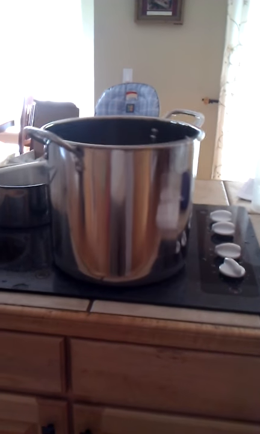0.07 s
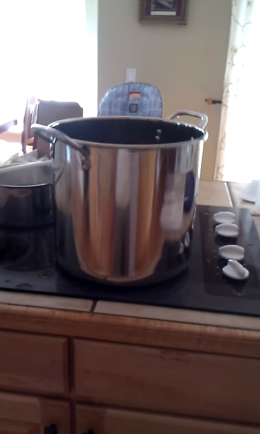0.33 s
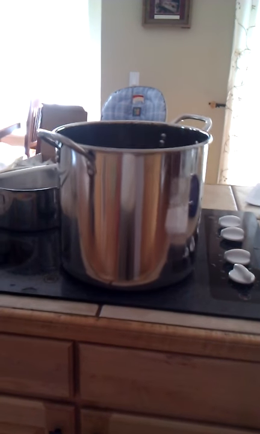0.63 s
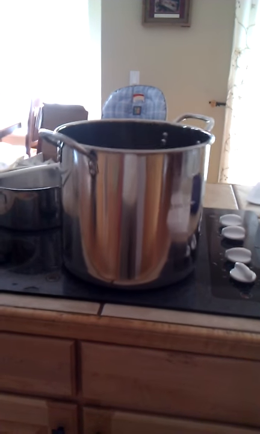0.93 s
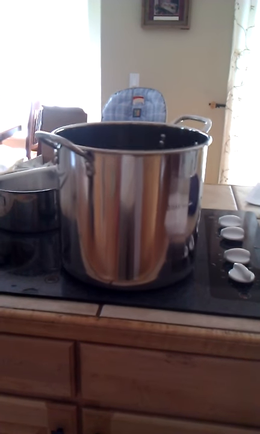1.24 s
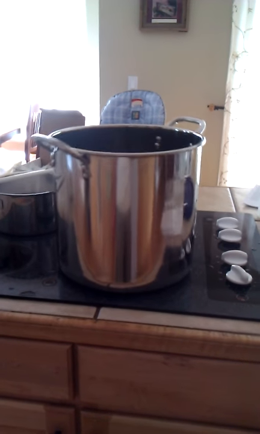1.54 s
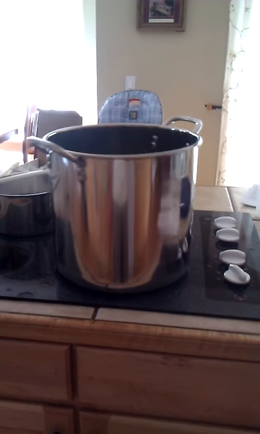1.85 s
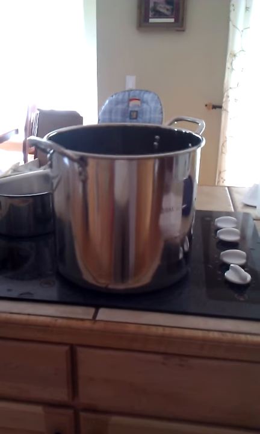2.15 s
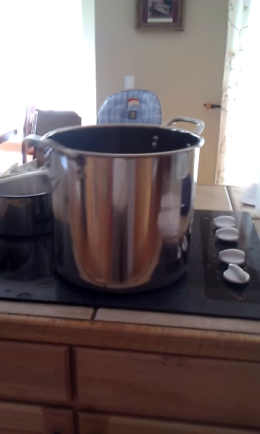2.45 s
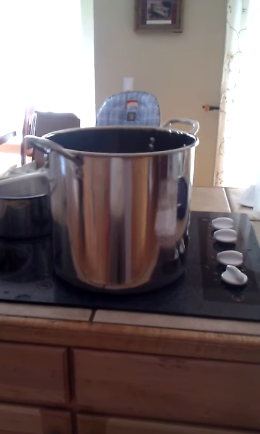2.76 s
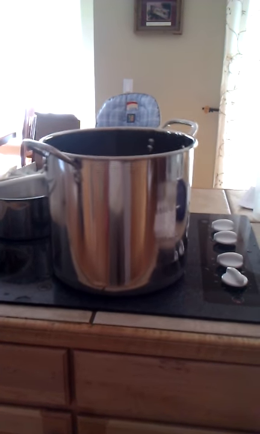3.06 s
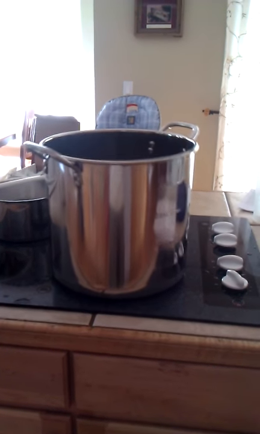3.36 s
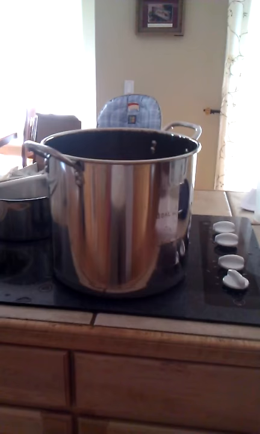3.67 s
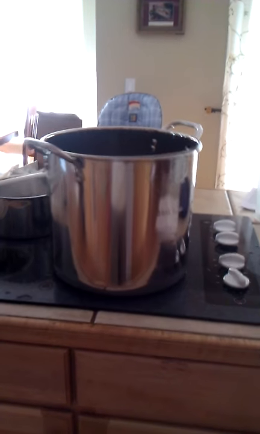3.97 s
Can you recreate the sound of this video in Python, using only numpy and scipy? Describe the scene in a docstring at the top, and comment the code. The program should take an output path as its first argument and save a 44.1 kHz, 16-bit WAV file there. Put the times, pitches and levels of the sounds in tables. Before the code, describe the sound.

A steel pot of heating water sizzles and rattles throughout over a low rumble, a little stronger in the first half second. Short buzzing bursts of steam break in irregularly. The base knocks on the cooktop around 1.3 and 2 seconds. The metal sings faintly near 2.9 seconds, then sharper buzzes and ticks cluster from 3 to 3.7 seconds, with a short kitchen echo.

```python
"""A pot about to boil

A tall steel stock pot heats on an electric cooktop. Tiny steam bubbles collapse on its hot base
in a rattling sizzle, and larger ones rumble lower down. Now and then a pocket of steam collapses
in a buzzing burst, or the base knocks on the cooktop. The pot and the kitchen ring with it all."""
import sys
import numpy as np
from scipy import signal
from scipy.fft import rfft, irfft, next_fast_len
from scipy.io import wavfile
from scipy.ndimage import map_coordinates

SR = 44100
rng = np.random.default_rng(int(sys.argv[2]) if len(sys.argv) > 2 else 0)


def master_out(mix):
    """Clip the mix to full scale and print it as 16-bit PCM to the path in sys.argv[1]."""
    frames = np.transpose(np.atleast_2d(mix))
    ceiling = np.clip(frames, -1, 1)
    pcm = np.round(ceiling * 32767).astype(np.int16)
    wavfile.write(sys.argv[1], SR, pcm)


N = 176400

# The tone of the quiet room: frequency_hz, level_db
ROOM_TONE = [(20, -2.5), (50, -15.5), (130, 9), (400, -2.5), (2000, -18.5), (8000, -25.5)]
# How long the kitchen's echo takes to fade by 60 dB: frequency_hz, fade_s
ECHO_TIMES = [(150, 0.43), (1000, 0.44), (4000, 0.38), (8000, 0.28)]
# The overall tone of the filled pot: frequency_hz, gain_db
POT_TONE = [(20, -34), (45, -17.5), (80, -28.5), (125, -13), (230, -7), (330, -1.5), (530, -8.5), (720, -2),
            (1130, -5.5), (1500, -3.5), (1900, 1), (2850, -3.5), (3600, -2), (4200, 1.5), (4700, -4.5),
            (5350, -9), (5700, -18.5), (6400, -19), (8000, -17.5), (9000, -47)]
# Pitches that the steel wall boosts: pitch_hz, width_hz, boost_db
WALL_RESONANCES = [(118.5, 10, 2.5), (153, 45, 6), (270, 24, 9.5), (380.5, 63, 6), (788.3, 24, 6.5),
                   (937.6, 33, 9), (1095, 26, 2), (1223, 28, 6.5), (1278, 15, 6), (1421, 32, 4.5),
                   (2017, 39, 2), (2278, 23, 5.5), (2655, 6.7, 0.5), (3230, 40, 7), (4300, 29, -1.5)]
# Clear notes from the wall: start_s, length_s, pitch_hz, level_db
WALL_NOTES = [(2.82, 0.19, 942, -47), (2.875, 0.12, 2008, -49.5), (3.042, 0.068, 1082, -48.5)]
# Knocks on the cooktop: start_s, level_db, centre_hz, half_width_octaves
BASE_KNOCKS = [(1.2461, -5.5, 3500, 1.7), (1.249, -1.5, 3950, 0.17), (1.256, -8.5, 1500, 1.6),
               (1.267, 0, 700, 0.83), (1.308, -11, 2000, 0.66), (1.942, 3, 400, 0.34),
               (1.944, 1, 1000, 0.6), (1.956, 1.5, 450, .4), (2.036, -3.5, 950, .4), (2.055, -5, 292, 0.22),
               (3.037, -2.5, 6000, 0.32), (3.127, -13, 2000, 0.85), (3.338, -4, 4230, 0.095),
               (3.586, -7, 4430, .4), (3.608, -1, 1400, 0.79), (3.616, -8.5, 3200, 2.3),
               (3.647, 0.5, 2700, .4), (3.679, -5, 2900, 0.28)]
# Steam bursts: start_s, length_s, rattle_db, pitch_hz, cavity_db, overtone_ratio, overtone_db
STEAM_POCKETS = [(0.061, 0.048, -39, 470, -27, 2.4, -21.5), (0.194, 0.026, -40, 1880, -25, 1.3, -39),
                 (0.289, 0.11, -47, 288, -25, 4.35, -28.5), (0.596, 0.013, -42.5, 1210, -31, 2.5, -38),
                 (0.803, 0.029, -47, 1800, -42, 2.4, -38), (1.179, 0.014, -43.5, 4060, -43, 1.27, -26),
                 (1.243, 0.027, -34.5, 585, -24.5, 6.5, -31), (1.297, 0.019, -39, 960, -29, 1.74, -27),
                 (1.327, 0.012, -40, 2500, -38, 2.65, -24), (1.352, 0.082, -50, 2380, -37, 0.99, -46),
                 (1.59, 0.03, -40.5, 1790, -40, 2.3, -37), (1.613, 0.084, -61, 1740, -37, 1.1, -36),
                 (1.934, 0.027, -37.5, 391, -22.5, 2.02, -26), (2.335, 0.008, -38, 1990, -31.5, 3.2, -29.5),
                 (2.453, 0.035, -38.5, 843, -29.5, 5, -31.5), (2.63, 0.061, -37.5, 1740, -43, 1.27, -41),
                 (2.807, 0.017, -38, 1800, -36, 2.6, -39), (3.029, 0.036, -41.5, 1785, -26.5, 3.1, -21),
                 (3.074, 0.027, -45.5, 1680, -27.5, 1.17, -30),
                 (3.142, 0.053, -44.5, 1220, -35.5, 1.7, -32.5),
                 (3.288, 0.021, -42, 1850, -32, 2.25, -29.5), (3.316, 0.031, -37, 1840, -33, 2.37, -18.5),
                 (3.384, .025, -46, 2060, -41, 2.4, -27.5), (3.585, 0.018, -38, 2780, -18.5, 1.3, -24.5),
                 (3.609, 0.015, -35.5, 2670, -19, 2.6, -19.5),
                 (3.635, 0.014, -42, 2550, -23.5, 2.85, -27.5), (3.7, 0.02, -49, 2050, -29.5, 1.3, -26)]
# How loud the small and large bubbles are: time_s, sizzle_db, rumble_db
SIMMER_LEVELS = [(0, -33, -37), (.08, -34.5, -31.5), (.16, -34.5, -41), (.22, -33.5, -30),
                 (.36, -34.5, -36), (.46, -37, -36.5), (.7, -40.5, -40), (1.03, -40, -43), (1.2, -39, -43),
                 (1.351, -39.5, -43), (1.54, -42.5, -41), (1.659, -40.5, -41.5), (1.85, -39, -39),
                 (2.099, -39, -38.5), (2.25, -40.5, -44), (2.41, -41, -42), (2.67, -39.5, -42.5),
                 (2.78, -40.5, -43), (2.98, -38, -37), (3.16, -36.5, -37), (3.26, -38.5, -40.5),
                 (3.42, -38, -41.5), (3.54, -38, -43), (3.72, -39, -42), (3.8, -39.5, -39),
                 (4, -39.5, -41.5)]


def amp(db):
    """Turn decibels into a gain."""
    return 10 ** (np.asarray(db) / 20)


def unit(x):
    """Scale a signal to an average (rms) level of 1."""
    return x / np.sqrt(np.mean(x ** 2) + 1e-20)


def along(points, hz):
    """Read between a table's rows on a log frequency scale."""
    f, values = np.transpose(points)
    return np.interp(np.log(hz + 1), np.log(f + 1), values)


def filtered(x, response):
    """Filter x; response gives the gain and phase at each frequency."""
    size = 2 * next_fast_len((N + SR) // 2)
    return irfft(rfft(x, size) * response(np.fft.rfftfreq(size, 1 / SR)), size)[..., :N]


def causal(db):
    """A filter with these gains that rings only after a hit (minimum phase)."""
    cepstrum = irfft(np.log(amp(db)))
    half = len(cepstrum) // 2
    return np.exp(rfft(np.r_[cepstrum[0], 2 * cepstrum[1:half], np.zeros(half)]))


def resonance(f, hz, q):
    """A peak of gain 1 at hz; a higher q rings longer."""
    return 1j * f * hz / q / (hz * hz - f * f + 1j * f * hz / q)


def wobble(per_s):
    """A smooth curve through per_s random points a second."""
    return map_coordinates(rng.standard_normal(N // 100), [np.arange(N) * per_s / SR])


def collapses(per_s, scatter_db, size):
    """Collapsing bubbles: clicks of random timing and strength."""
    strength = amp(scatter_db * np.clip(rng.standard_normal(size), -2, 2))
    return unit((rng.random(size) < per_s / SR) * strength * rng.choice([-1, 1], size))


def room_tone(level_db=-65):
    """The room's faint, low hush."""
    return amp(level_db) * unit(filtered(rng.standard_normal(N), lambda f: amp(along(ROOM_TONE, f))))


def kitchen(tail_db=1, early_db=-1.5, early_s=0.011):
    """Sound arrives directly, then off the cooktop and near walls, then as a fading echo."""
    hz, t, spectrum = signal.stft(rng.standard_normal(SR // 2), SR, nperseg=256)
    tail = signal.istft(spectrum * amp(-60 * t / along(ECHO_TIMES, hz)[:, None]), SR, nperseg=256)[1]
    early = rng.standard_normal(len(tail)) * np.exp(-np.arange(len(tail)) / SR / early_s)
    path = amp(tail_db) * tail / np.linalg.norm(tail) + amp(early_db) * early / np.linalg.norm(early)
    path[0] += 1  # the direct sound
    return path / np.linalg.norm(path)


def pot(f):
    """The steel wall and the water colour every collapse."""
    wall_db = sum(boost_db / (1 + (2 * (f - hz) / width) ** 2) for hz, width, boost_db in WALL_RESONANCES)
    db = along(POT_TONE, f) + wall_db
    return causal(db) / np.sqrt(np.mean(amp(db) ** 2))


def singing_wall(attack_s=0.031, fade_s=0.3, waver_hz=4.02, waver_db=1.3):
    """The wall keeps ringing on one slightly unsteady note, then dies away."""
    out, t = np.zeros(N), np.arange(N) / SR
    for start, length, hz, db in WALL_NOTES:
        rise = np.clip((t - start) / attack_s, 0, 1)
        fall = amp(-60 * np.maximum(t - start - length, 0) / fade_s)
        phase = 2 * np.pi * np.cumsum(hz + waver_hz * wobble(per_s=40)) / SR
        out += amp(db + waver_db * wobble(per_s=40)) * rise * fall * np.sqrt(2) * np.sin(phase)
    return out


def steel_pings(per_s=110, low_hz=798.6, high_hz=4417, spread_db=3.5, attack_s=0.003, fade_s=0.098):
    """Hard collapses ring patches of steel briefly; a louder sizzle gives louder pings."""
    out, t = np.zeros(N + SR), np.arange(SR // 8) / SR
    times, sizzle_db, _ = np.transpose(SIMMER_LEVELS)
    rise = 1 - np.exp(-t / attack_s)
    for when, pitch, strength in rng.random((int(per_s * N / SR), 3)):
        hz = low_hz + (high_hz - low_hz) * pitch
        db = np.interp(when * N / SR, times, sizzle_db) - 11 + spread_db * (strength - .5)
        out[int(when * N):][:len(t)] += amp(db - 60 * t / fade_s) * rise * np.sin(2 * np.pi * hz * t)
    return signal.fftconvolve(out[:N], kitchen())[:N]


def base_knocks():
    """The base hits the cooktop: each knock has its own loudness and pitch, from thud to bright tick."""
    out = np.zeros(N + 2 * SR)
    octave = np.log2(np.fft.rfftfreq(SR // 4 * 2, 1 / SR) + 1)
    for start, db, hz, half_width in BASE_KNOCKS:
        colour_db = -10 * np.log10(1 + ((octave - np.log2(hz)) / half_width) ** 4)
        blow = irfft(causal(db + colour_db))[:SR // 10]
        heard = signal.fftconvolve(blow, kitchen())
        out[round(start * SR):][:len(heard)] += heard
    return out[:N]


def steam_pockets(attack_s=0.0005, release_s=0.0069, low_cut_hz=380, cavity_q=6.16):
    """A pocket of steam collapses in a quick run of clicks that rings its cavity at two pitches."""
    out, t = np.zeros(N + 2 * SR), np.arange(SR // 4) / SR
    f = np.fft.rfftfreq(2 * len(t), 1 / SR)
    for start, length, rattle_db, hz, cavity_db, ratio, overtone_db in STEAM_POCKETS:
        rise = 1 - np.exp(-t / attack_s)
        accent = 1 + 0.97 * np.exp(-t / 0.0024)  # the first blows are the hardest
        shape = rise * accent * np.exp(-np.maximum(t - length, 0) / release_s)
        clicks = collapses(per_s=1500, scatter_db=2, size=len(t))
        volley = unit(shape * clicks) * np.sqrt(np.mean(shape ** 2))
        rattle = amp(rattle_db) ** 2 / (1 + (low_cut_hz / (f + 1)) ** 2)
        cavity = abs(amp(cavity_db) * resonance(f, hz, cavity_q)) ** 2
        overtone = abs(amp(overtone_db) * resonance(f, hz * ratio, 1.9 * cavity_q)) ** 2
        colour = causal(10 * np.log10(rattle + cavity + overtone))
        burst = irfft(rfft(volley, 2 * len(t)) * colour)[:len(t)]
        heard = signal.fftconvolve(burst, kitchen())
        out[round(start * SR):][:len(heard)] += heard
    return out[:N]


def simmer(small_per_s=1500, large_per_s=420, split_hz=970, spots=6):
    """Bubbles collapse at several spots on the base: small ones sizzle, large ones rumble."""
    lead = SR // 4  # begin early so the room is already ringing
    times, *levels = np.transpose(SIMMER_LEVELS)
    clumps_db = 0.88 * wobble(per_s=45)  # bubbles come in clumps
    gains = [amp(np.interp(np.arange(N) / SR, times, db) + clumps_db) for db in levels]
    small_gain, large_gain = [np.pad(gain, (lead, 0), 'edge') for gain in gains]
    high, low = [signal.butter(2, split_hz, kind, fs=SR, output='sos') for kind in ('high', 'low')]
    out = np.zeros(N)
    for _ in range(spots):
        small = small_gain * collapses(small_per_s / spots, scatter_db=3, size=N + lead)
        large = large_gain * collapses(large_per_s / spots, scatter_db=3, size=N + lead)
        bubbles = signal.sosfilt(high, small) + signal.sosfilt(low, large)
        out += signal.fftconvolve(bubbles, kitchen())[lead:lead + N]
    return out / np.sqrt(spots)


def scene():
    """Bubbles, knocks and pings sound through the pot, joined by its singing wall and the room."""
    hush = room_tone()
    pot_sounds = filtered(simmer() + steam_pockets() + base_knocks() + steel_pings(), pot)
    return (pot_sounds + singing_wall() + hush)[None]


def record(dry):
    """Cut away the highest treble."""
    top_hz, slope_width_hz = 8400, 400
    return filtered(dry, lambda f: np.clip((top_hz - f) / slope_width_hz + .5, 0, 1))


dry = scene()
out = record(dry)
master_out(out)
```